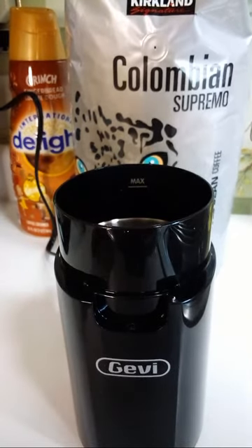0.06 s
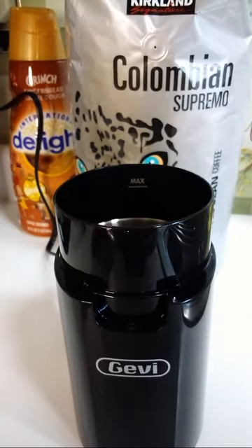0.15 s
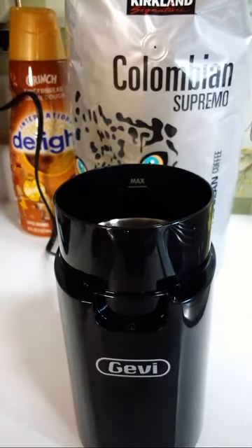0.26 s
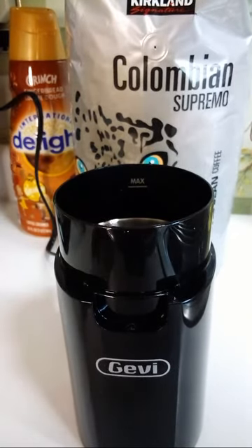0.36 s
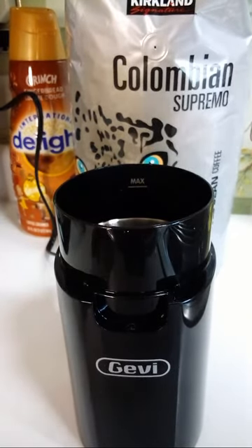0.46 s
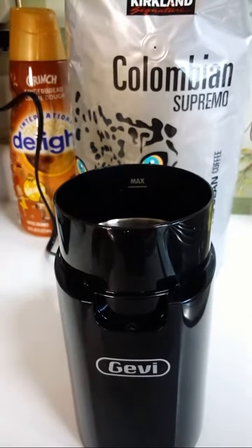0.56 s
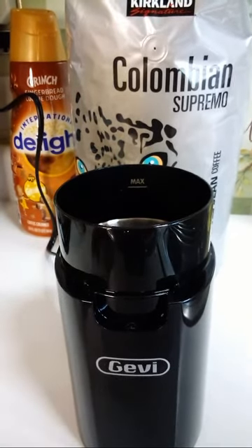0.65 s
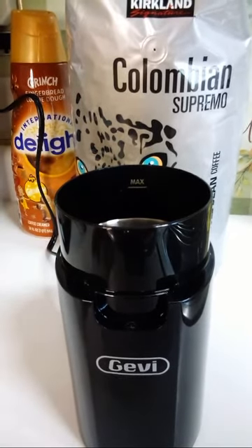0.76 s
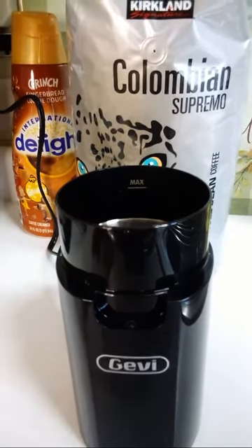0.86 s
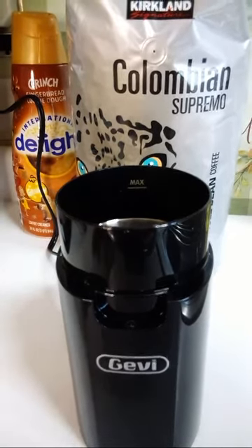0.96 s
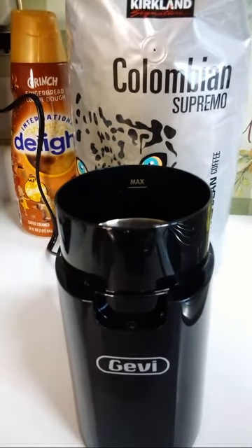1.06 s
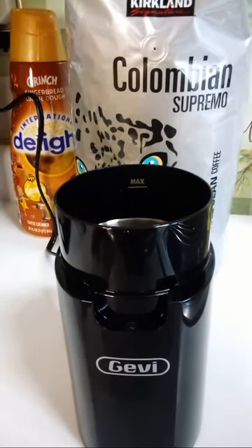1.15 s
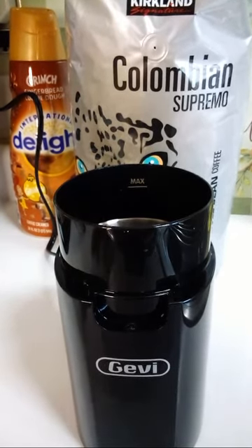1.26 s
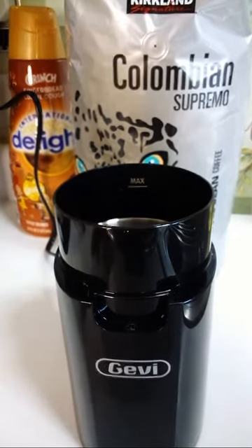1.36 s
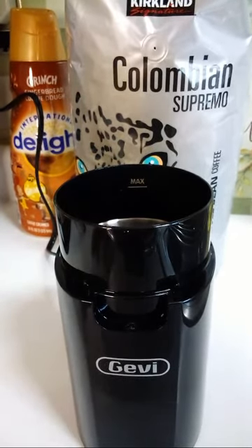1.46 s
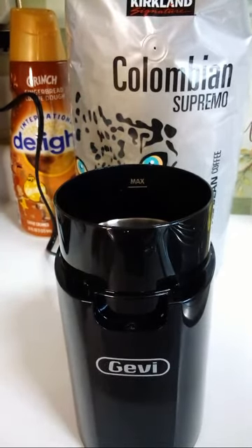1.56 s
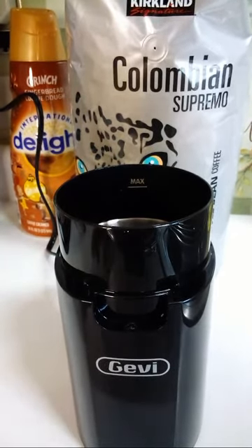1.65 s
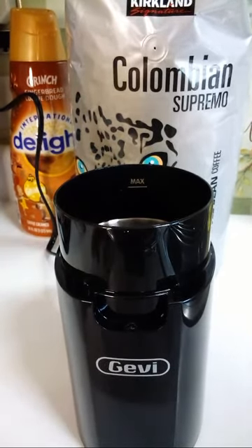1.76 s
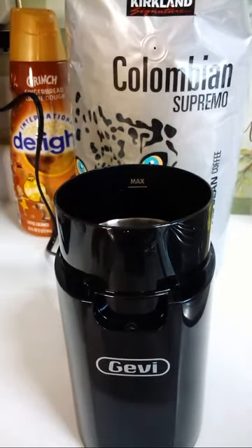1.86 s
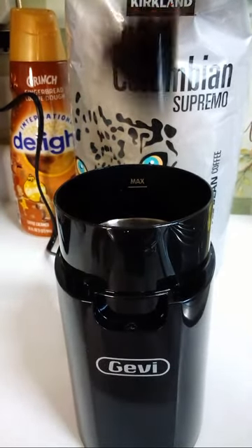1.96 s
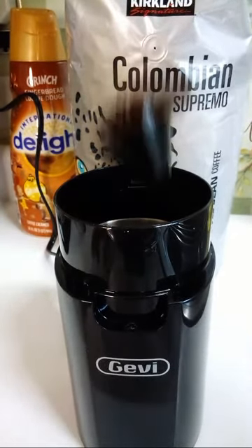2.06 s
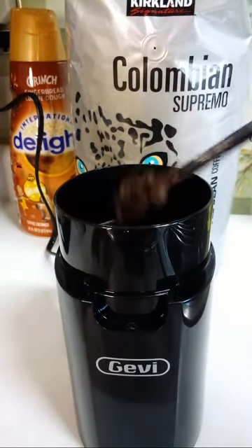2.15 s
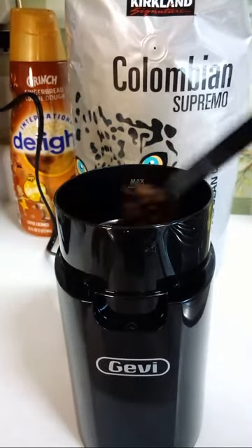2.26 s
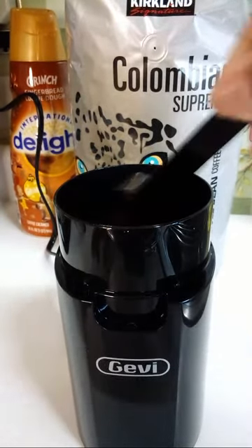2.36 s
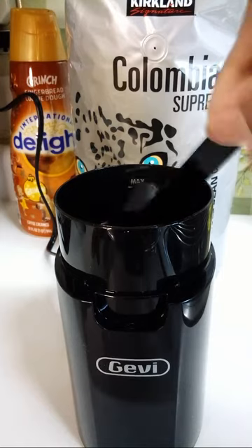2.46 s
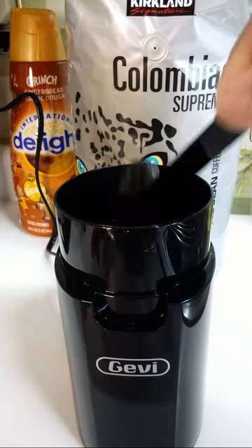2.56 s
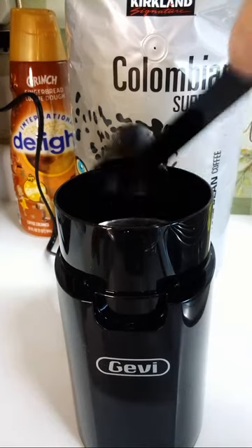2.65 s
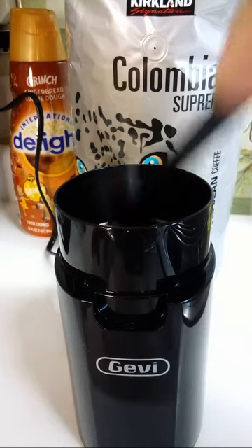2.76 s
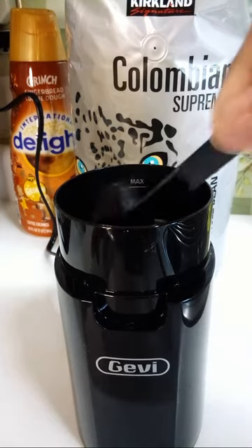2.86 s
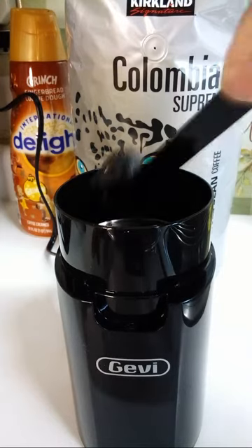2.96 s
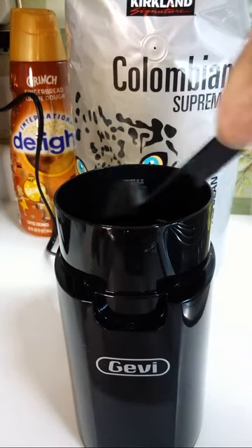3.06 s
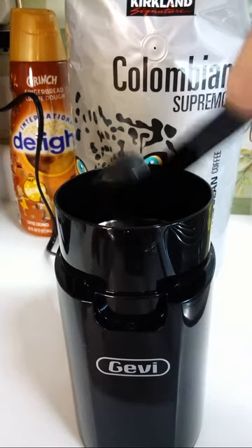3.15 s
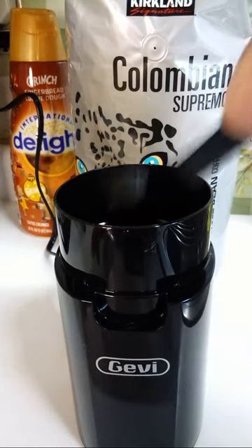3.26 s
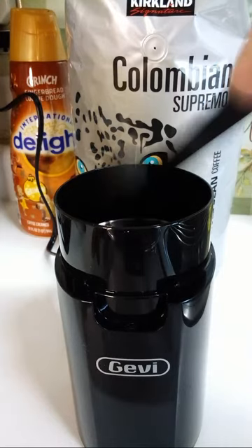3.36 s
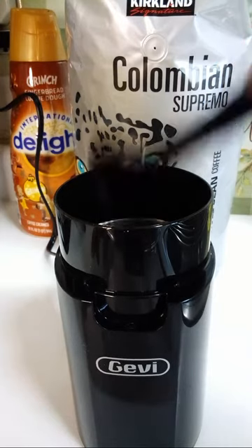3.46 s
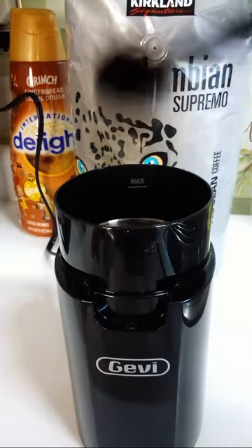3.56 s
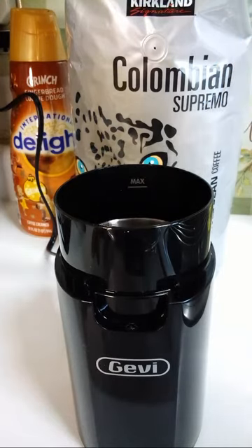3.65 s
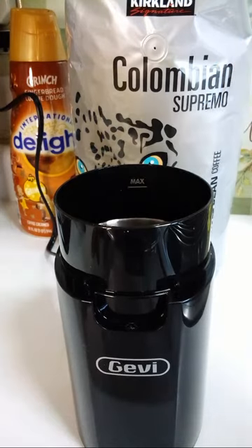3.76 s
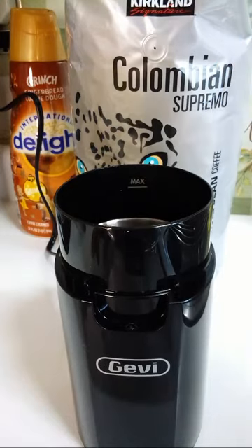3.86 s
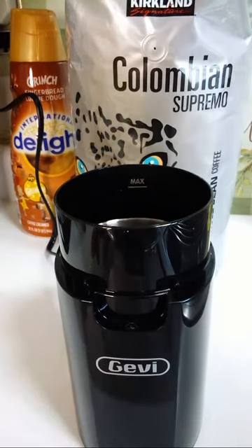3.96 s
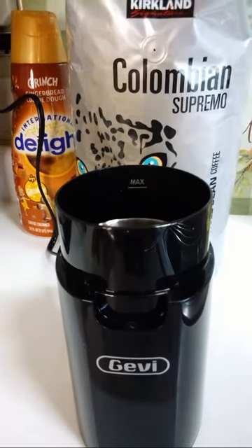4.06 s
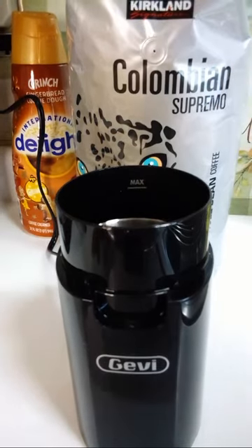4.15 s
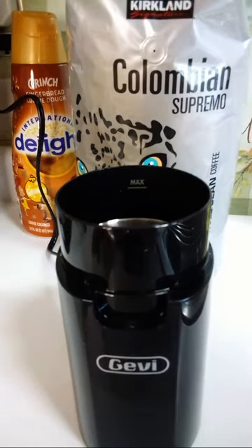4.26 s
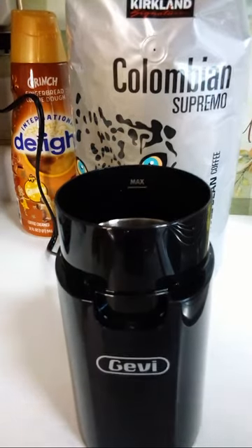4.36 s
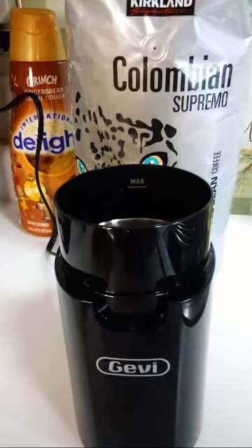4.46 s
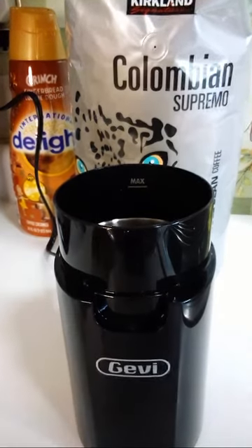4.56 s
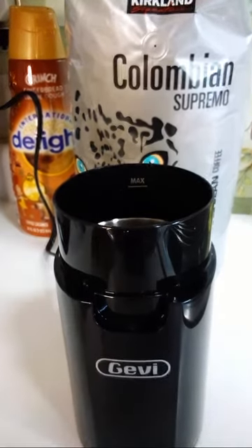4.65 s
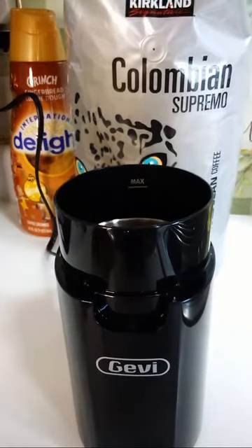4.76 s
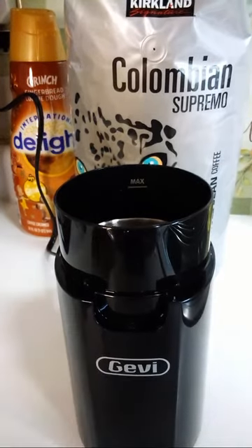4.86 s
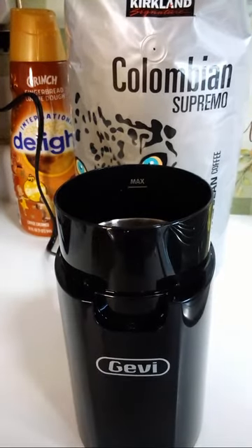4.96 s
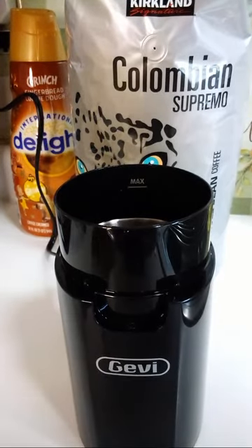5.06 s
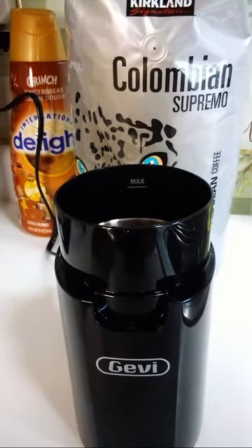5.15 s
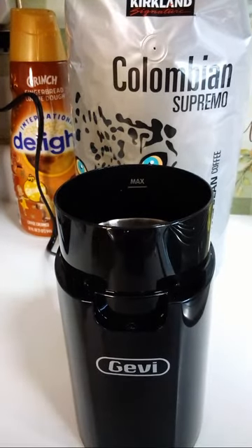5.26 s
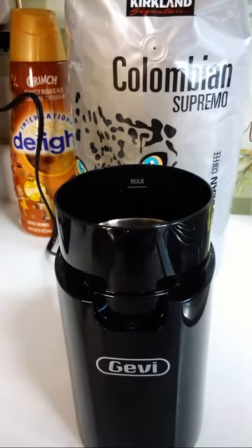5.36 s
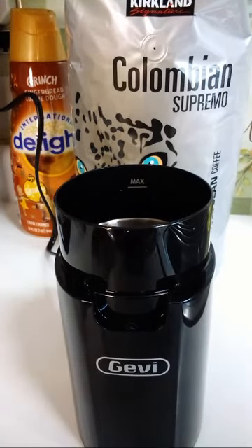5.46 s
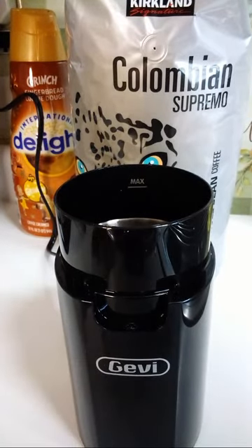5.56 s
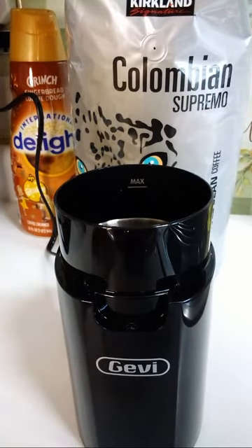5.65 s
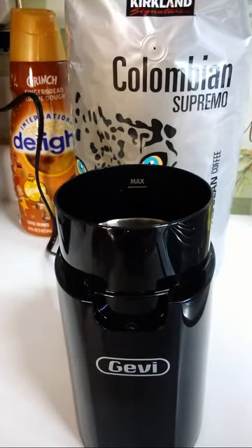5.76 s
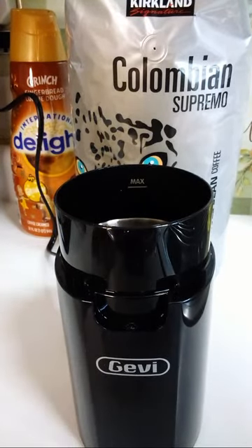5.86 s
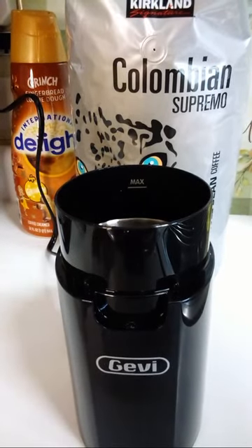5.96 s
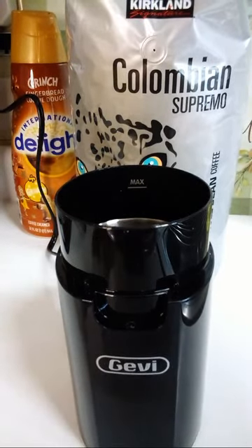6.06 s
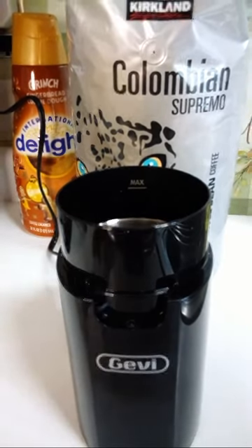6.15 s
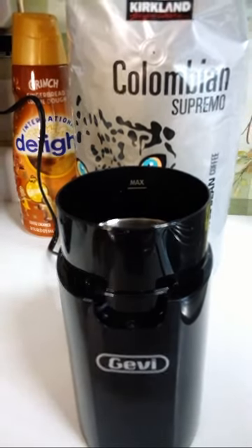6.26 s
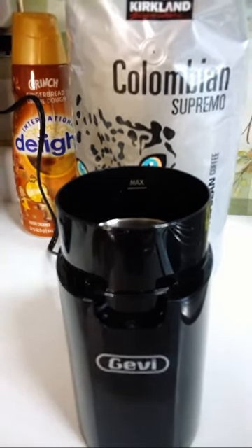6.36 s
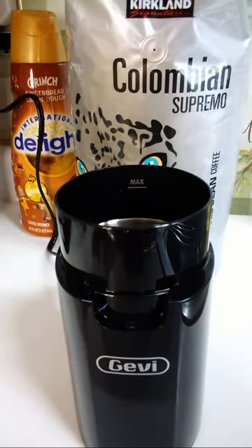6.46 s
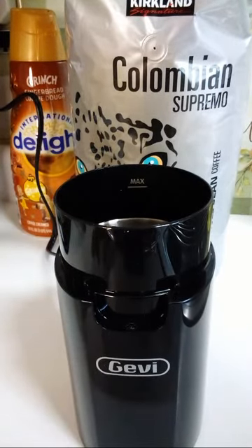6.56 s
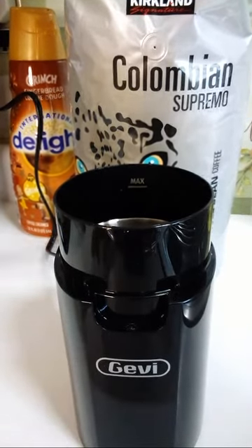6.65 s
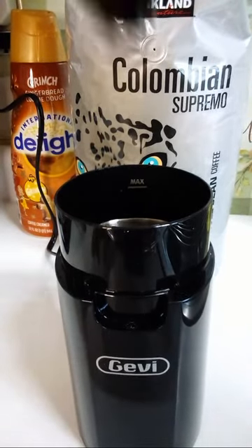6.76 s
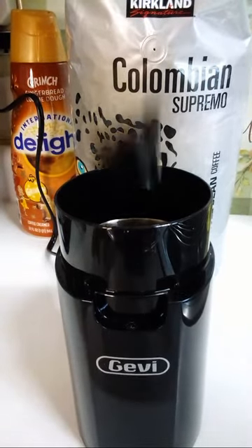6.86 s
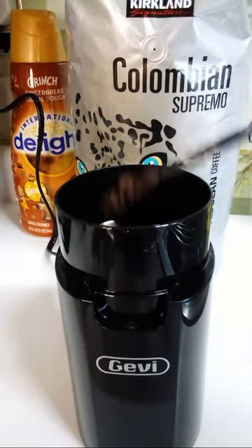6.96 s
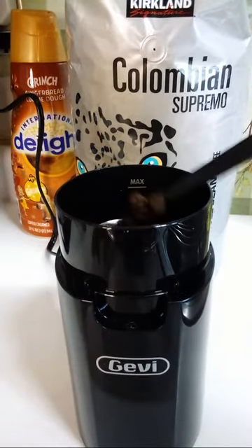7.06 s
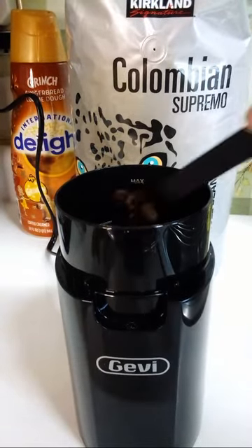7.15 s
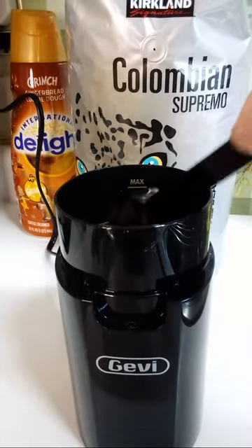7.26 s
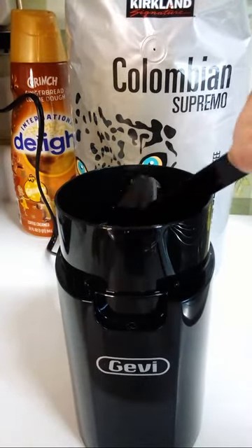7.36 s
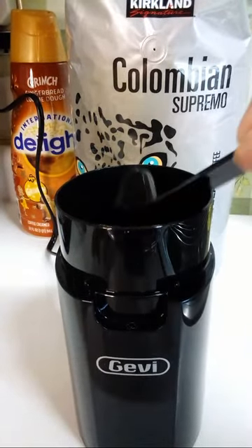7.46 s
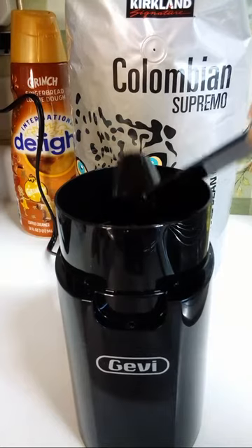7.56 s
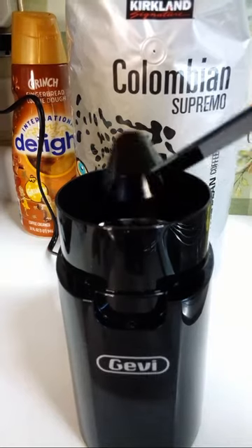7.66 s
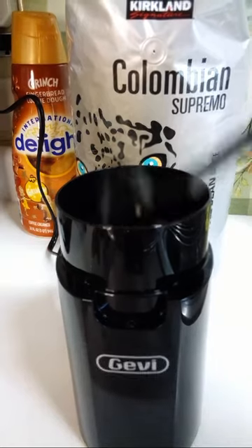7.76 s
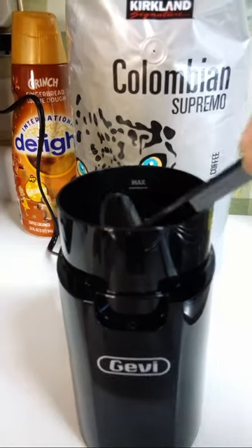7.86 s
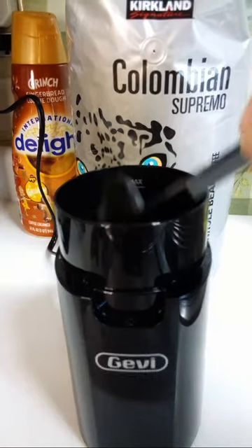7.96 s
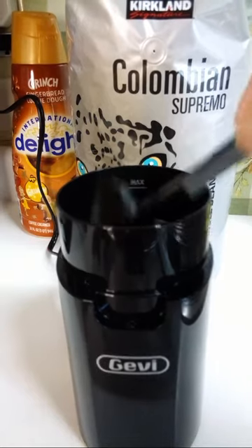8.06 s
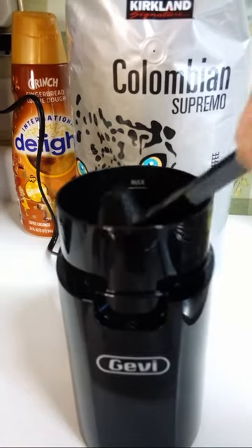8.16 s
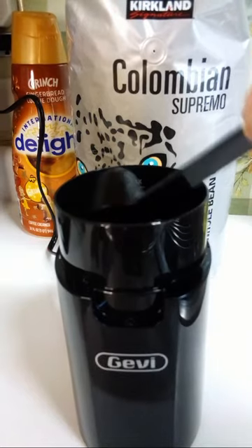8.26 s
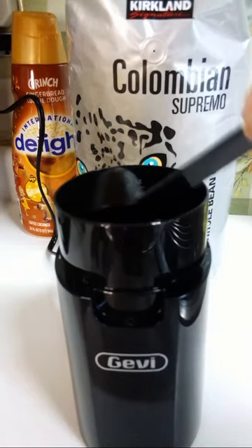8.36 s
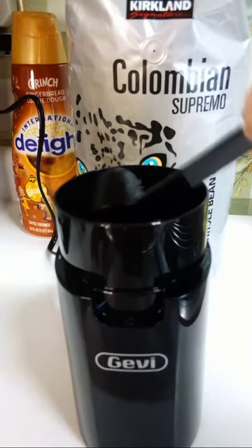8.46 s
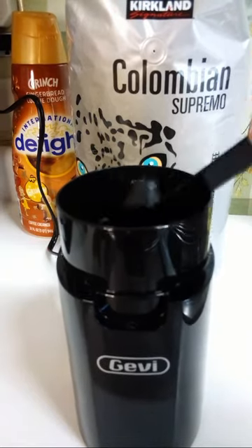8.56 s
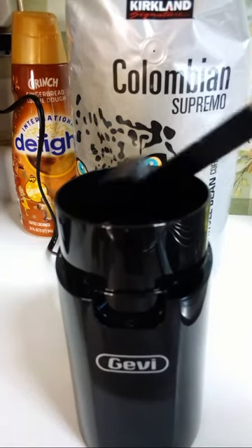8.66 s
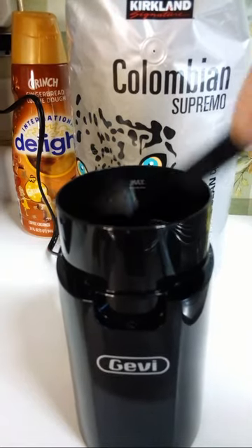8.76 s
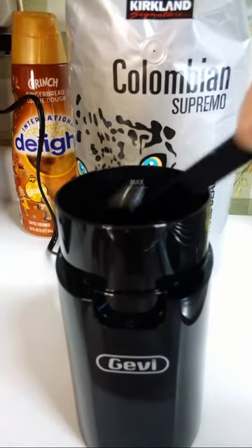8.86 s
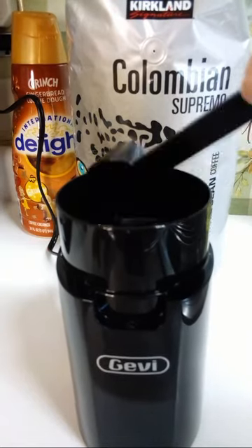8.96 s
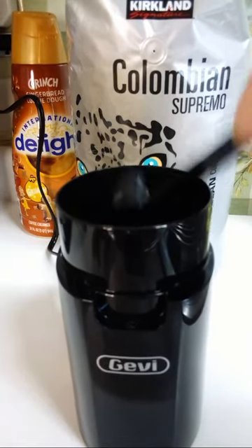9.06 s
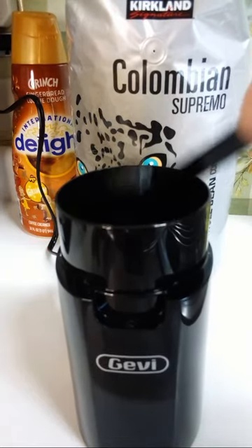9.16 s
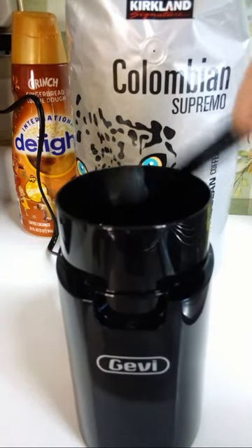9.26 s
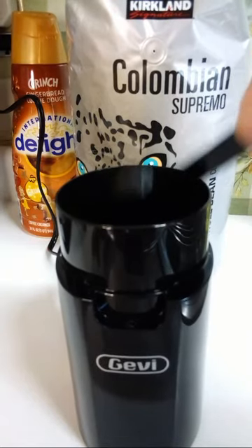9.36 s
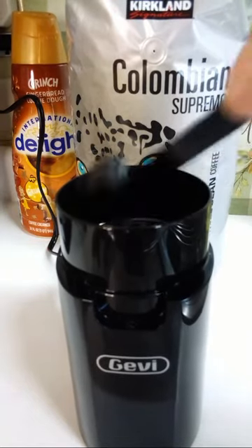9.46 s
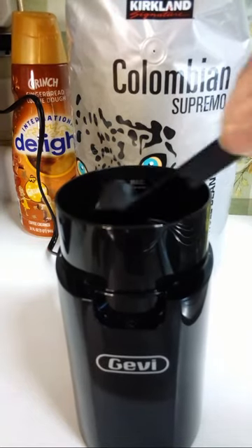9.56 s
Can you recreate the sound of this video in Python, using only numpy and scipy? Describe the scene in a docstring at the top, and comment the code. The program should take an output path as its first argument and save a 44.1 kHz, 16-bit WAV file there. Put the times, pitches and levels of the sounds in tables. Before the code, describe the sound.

Coffee beans are scooped from a rustling foil bag and clatter into a small grinder's steel bowl, twice, in a quiet kitchen.

```python
"""Over a low wavering hum and faint hiss, a plastic scoop digs through a foil bag of coffee beans: filtered crackle,
foil hiss, rumble. A dull shuffle swells, then beans pour into the steel bowl of a small grinder: noise cracks and
clatter, decaying modes of bowl, rim and shell, random rebounds, a trickle of small beans between.
A thin ping, a second dig with scoop clacks, a second pour. Bumps and faint ticks are scattered throughout.
A phone stands close by in a quiet kitchen; a noise tail forms the room's answer."""
import sys
import numpy as np
from scipy import signal
from scipy.fft import rfft, irfft, next_fast_len
from scipy.io import wavfile
from scipy.ndimage import uniform_filter1d

SR = 44100
rng = np.random.default_rng(int(sys.argv[2]) if len(sys.argv) > 2 else 0)


def put_to_file(sound):
    """Save the sound as 16-bit audio at rate SR, in the file named by the first command-line argument."""
    columns = np.atleast_2d(sound).T  # one column per channel
    safe = np.clip(columns, -1, 1)
    whole_steps = np.round(safe * 32767)
    wavfile.write(sys.argv[1], SR, whole_steps.astype(np.int16))


N = 422919

# scoop knocking the rim, or heavy clump landing: t/s, blow level/dB, shell re blow/dB, rim re blow/dB, favoured f/Hz
KNOCKS = [(2.2631, -11.5, -11.5, -4.5, 940), (2.795, -31, -17, 3.5, 1190), (2.8186, -23, -1.5, -5.5, 1240),
          (3.0556, -18, -5, -5.5, 1275), (3.0746, -30.5, -4.5, -1, 1130), (3.2421, -28, 0, 3, 1310),
          (3.4078, -23, -14, 0.5, 1204), (7.0329, -25, -31.5, -2, 652), (7.167, -24, -2.5, -0.5, 1020),
          (7.8224, -24, -7, -14, 615), (7.8785, -30, -4, -7, 695), (8.1122, -30, -2, -8.5, 712),
          (8.3226, -26.5, -6, -4.5, 710), (8.533, -21, -16, -10, 1310), (8.8073, -24.5, -11, -2.5, 722),
          (9.0698, -20.5, -14, -24, 1345), (9.3084, -21, -12.5, -11.5, 1390),
          (9.5528, -18, -16, -18.5, 1440)]
# loose beans hitting steel: t/s, blow level/dB, favoured f/Hz
BEANS = [(2.176, -13.5, 6700), (2.3126, -18, 5450), (2.3411, -15.5, 6200), (2.4148, -23, 6200),
         (2.463, -23, 4600), (2.4814, -14.5, 6300), (2.5014, -21, 4450), (2.6, -30, 4100),
         (2.634, -22, 4030), (2.6654, -18, 6140), (2.766, -31, 6240), (7.0825, -25.5, 4600),
         (7.2677, -30.5, 4500), (7.3376, -28.5, 4500), (7.4247, -38.5, 4340), (7.5776, -41.5, 3600),
         (7.6261, -34, 4400), (7.782, -35.5, 4400), (7.9548, -29.5, 5040), (7.9857, -15, 6270),
         (8.0322, -24, 6000), (8.1817, -32, 6400), (8.31, -37, 4350), (8.3994, -30.5, 6400),
         (8.5235, -28.5, 5000), (8.5593, -13.5, 6200), (8.7929, -36.5, 5000), (9.0831, -16.5, 6150)]
# modes of the grinder shell: f/Hz, level/dB, t60/s
SHELL_MODES = [(686.5, 1.5, 0.11), (1101, -1, 0.14), (1209, 1.5, 0.22), (1306, 10, 0.033)]
# modes of the bowl rim: f/Hz, level/dB, t60/s
RIM_MODES = [(2535, 8.5, 0.042), (2772, 2.5, 0.033), (2890, -1.5, 0.036)]
# modes of the bowl: f/Hz, level/dB, t60/s
BOWL_MODES = [(3840, -14.5, 0.027), (4298, -5, 0.06), (4740, -9, 0.03), (6330, 2.5, 0.09),
              (6520, -0.5, 0.07)]
# broad clatter spectrum: f/Hz, relative density/dB
CLATTER_SPECTRUM = [(400, -26.5), (2200, -18.5), (2600, -6.5), (3400, -6.5), (6400, -2.2), (7300, -11),
                    (8000, -17.5)]
# treble spectrum of sparkle and foil: f/Hz, relative density/dB
SPARKLE_SPECTRUM = [(7000, -36), (8000, -1.5), (11500, -5), (12500, 4), (16000, -3)]
# scoop tilts that let beans run: t/s, running time/s, level/dB
TILTS = [(2.176, .52, -40.5), (2.761, 0.038, -38.5), (7.026, 0.038, -45), (7.204, 0.16, -53.5),
         (7.4, 0.49, -67), (7.556, 0.55, -58)]
# two digs in the bag: t/s, bean rush level/dB, foil hiss re rush/dB, rumble re rush/dB
DIGS = [
    [(0, -61.5, 7.5, -16), (.085, -52.5, -8, 6.5), (.3, -57.5, 3.5, -6), (.345, -48, -1.5, -0.5),
     (.43, -59.5, -5, 1.5), (.55, -63.5, -34, 2.5), (.59, -79, 8, -14), (.7, -59, -22, 2),
     (.76, -119, -10, 15)],
    [(4.483, -76, -9, 4), (4.492, -48.5, -52, 6), (4.55, -39.5, -2, -1.5), (4.64, -41, -9.5, -4.5),
     (4.67, -51, -15, -2.5), (4.74, -48.5, -5, -3), (4.8, -59, -12, -2), (5.08, -50, -3, 2),
     (5.32, -53.5, 4.5, -14.5), (5.52, -79, 9, 5), (5.63, -66.5, -4, 7), (5.68, -89, 1, 1)],
]
# bean rush spectrum: f/Hz, relative density/dB
RUSH_SPECTRUM = [(500, -21), (1500, -8.5), (2300, -3), (3500, -10.5), (6500, -8), (8000, -32)]
# rumble spectrum of the shifting mass: f/Hz, relative density/dB
RUMBLE_SPECTRUM = [(60, -17.5), (130, -9.0), (500, -4), (750, -13.0), (1200, -34.0)]
# beans shifting as the full scoop is carried: t/s, level/dB
CARRY_SWELL = [(1.4, -87.5), (2.17, -66)]
# shuffle spectrum: f/Hz, relative density/dB
SHUFFLE_SPECTRUM = [(350, -12.5), (800, 0), (1300, -12.5), (4000, -31.5)]
# beans clacking on the scoop: t/s, peak level/dB
SCOOP_CLACKS = [(0.087, -38), (.248, -45), (0.697, -48), (5.1686, -27.5), (5.181, -32), (5.2444, -31),
                (5.269, -30.5), (5.296, -32.5)]
# modes of the scoop: f/Hz, level/dB, t60/s
SCOOP_MODES = [(2740, 3, 0.031), (5200, 7, 0.0027), (6750, 0.5, 0.021)]
# dull bumps through the counter: t/s, level/dB, base f/Hz
BUMPS = [(0.066, -27.5, 175.4), (0.202, -34, 183), (0.707, -40, 166.5), (1.331, -48.5, 408),
         (2.82, -31.5, 296), (3.07, -31.5, 238.4), (3.26, -35.5, 247), (4.493, -30.5, 179.3),
         (4.643, -28, 150), (4.77, -33.5, 426), (4.918, -40.5, 440), (7.092, -43, 311)]
# modes of a bump: multiple of base f/1, level/dB, t60/s
BUMP_MODES = [(.55, 4.5, 0.076), (1.0, 9.5, 0.12), (2.3, 1, 0.047)]
# faint ticks of foil and handle: t/s, noise level/dB
TICKS = [(0.328, -53), (0.526, -52), (0.854, -61.5), (4.447, -62), (5.433, -45.5), (5.524, -52),
         (6.0806, -53)]
# one thin metallic ping: t/s, peak level/dB, f/Hz, t60/s
PING = (3.804, -57, 5820, .13)
# room tail spectrum: f/Hz, relative density/dB
TAIL_SPECTRUM = [(2500, -8.5), (6000, -3.5), (8000, -29.5)]
# kitchen hiss spectrum: f/Hz, relative density/dB
HISS_SPECTRUM = [(30, -32), (46, -14.5), (72, -0.5), (235, -25), (298, -22.5), (1090, -35), (9990, -52),
                 (13700, -51), (16500, -57)]
# slow course of the low hum: t/s, level/dB
HUM_SWELL = [(0, -60), (6.5, -82), (9.6, -69.5)]

FLUTTER_RAD = .9
SHELL_SPOT_DB_PER_OCT, BOWL_SPOT_DB_PER_OCT = -20.5, -11.5  # away from the favoured pitch
CLACK_EDGE_RATIO, CLACK_T60_S, CLACK_DB = 1.03, .03, -9.5  # CLACK_DB: before body mix
CRACK_T60_S, CRACK_DB = 0.0056, -4  # first contact, re clatter
GRAZE_S, GRAZE_DB = .006, -30  # scrape ahead of the full blow
KNOCK_BRIGHT_DB, BEAN_BRIGHT_DB = -18.5, -7  # mean treble re blow
BRIGHT_SCATTER_DB, COLOUR_SCATTER_DB = 3, 4  # no two blows alike
RUN_UP_S, THIN_DB_PER_S, SETTLE_DB_PER_S = 0.016, 6, 185.5  # settling adds to thinning
HISS_DB = -65
TOP_HZ = 16000


def strikes():
    """Blows snap, clack near a favoured pitch, clatter, sparkle and ring bowl; knocks also ring rim and shell."""
    rings, snaps, clatter, sparkle, thud = np.zeros((5, N))
    t = np.arange(5000) / SR
    rise = 1 - fade(t, 0.0057)
    for s, peak_db, *knock, spot_hz in list(KNOCKS) + list(BEANS):
        s = s - GRAZE_S
        push = rebounds(t)
        bright_db = KNOCK_BRIGHT_DB if knock else BEAN_BRIGHT_DB
        bright_db += BRIGHT_SCATTER_DB * rng.standard_normal()

        bowl_tilt_db = 0 if knock else BOWL_SPOT_DB_PER_OCT * octaves_off(BOWL_MODES, spot_hz)
        body = undb(-14.0) * ring(BOWL_MODES, t, 4.0, bowl_tilt_db, FLUTTER_RAD)
        clack = spot_clack(t, spot_hz)
        if knock:
            shell_db, rim_db = knock
            shell_tilt_db = SHELL_SPOT_DB_PER_OCT * octaves_off(SHELL_MODES, spot_hz)
            shell = ring(SHELL_MODES, t, 2, shell_tilt_db, 1.3)
            body = body + undb(rim_db) * ring(RIM_MODES, t, 1.7, rough=FLUTTER_RAD)
            body = body + undb(shell_db) * (shell + clack)
            add(thud, s, undb(peak_db + shell_db - 9.0) * rise * fade(t, 0.03))
        else:
            body = body + undb(-5) * clack
        add(rings, s, undb(peak_db) * signal.fftconvolve(push, body)[:len(t)])

        contact = push * (t > GRAZE_S - 1 / SR)  # scrape excites no snap or sparkle
        glint = signal.fftconvolve(contact, fade(t, 0.0078))[:len(t)]
        add(sparkle, s, undb(peak_db + bright_db) * glint)
        add(snaps, s, undb(peak_db + bright_db + 6.5) * contact)

        decay = rise * fade(t, 0.039) + undb(CRACK_DB) * fade(t, CRACK_T60_S)
        contour = signal.fftconvolve(push, decay)[:len(t)]
        add(clatter, s, level(clatter_noise(t), peak_db - 10.5) * contour)
    thud = thud * level(band(rng.standard_normal(N), 360, 2100, order=1), 0)
    return rings + band(snaps, 3400, 16000) + thud + clatter + sparkle * noise(SPARKLE_SPECTRUM)


def octaves_off(modes, spot_hz):
    """Distance of each mode from the pitch that the struck spot favours."""
    return np.abs(np.log2(np.array(modes)[:, :1] / spot_hz))


def spot_clack(t, spot_hz):
    """Narrow decaying noise at the favoured pitch."""
    clack = band(rng.standard_normal(len(t)), spot_hz / CLACK_EDGE_RATIO, spot_hz * CLACK_EDGE_RATIO)
    clack = clack * fade(t, CLACK_T60_S)
    return undb(CLACK_DB) * clack / np.max(np.abs(clack))


def clatter_noise(t):
    """Broad clatter noise with a chance colour for each blow."""
    hz = np.geomspace(500, 8000, 18)
    scatter = np.c_[hz, COLOUR_SCATTER_DB * rng.standard_normal(len(hz))]
    return colour(colour(rng.standard_normal(len(t)), CLATTER_SPECTRUM), scatter)


def rebounds(t):
    """A scrape, full contact, then neighbours jostling in sparse decaying impulses; unit energy."""
    chance = rng.standard_normal(len(t))
    sparse = (np.abs(chance) > 2.7) * np.abs(chance)
    push = sparse * undb(-18.5) * fade(t, 0.11) * (t > GRAZE_S)
    push = push + undb(GRAZE_DB) * chance * (t < GRAZE_S) * t / GRAZE_S
    push[int(GRAZE_S * SR)] = 1
    return push / np.sqrt(np.sum(push ** 2))


def trickle():
    """Small beans tick, each tick waking one mode; rolling beans keep rim and shell humming."""
    t = np.arange(3000) / SR
    ticks = np.zeros(N)
    for mode in [*RIM_MODES, *BOWL_MODES]:
        ticks += signal.fftconvolve(grains(60, 3.5), ring([mode], t, 0, rough=1))[:N]
    rattle = crackle(CLATTER_SPECTRUM, 140, 2.6, .04)
    sparks = patter(130, 2.8, 0.012) * noise(SPARKLE_SPECTRUM)
    shell = undb(-1.0) * ring(SHELL_MODES, t, 0, rough=2 * FLUTTER_RAD)
    hum = ring(RIM_MODES, t, 0, rough=2 * FLUTTER_RAD) + shell
    rolling = level(signal.fftconvolve(grains(400, 6.0), hum)[:N], -12.5)
    return flow() * (rolling + level(ticks, -14.0) + undb(-1.5) * rattle + undb(-5.0) * sparks)


def flow():
    """Beans start to run at each tilt, thin out slowly while they run, then settle fast."""
    out = np.zeros(N)
    for s, running_s, db in TILTS:
        t = np.arange(N) / SR - s
        loss_db = THIN_DB_PER_S * t + SETTLE_DB_PER_S * np.maximum(t - running_s, 0)
        out += undb(db - loss_db) * np.clip(t / RUN_UP_S, 0, 1)
    return out


def dig():
    """Beans rush round the scoop, the foil hisses and the mass shifts with a rumble."""
    rush, foil_db, rumble_db = curves(DIGS)
    beans = crackle(RUSH_SPECTRUM, 1100, 1.6, .04)
    foil = patter(1000, 1.8, 0.023) * noise(SPARKLE_SPECTRUM)
    rumble = patter(240, 1.4, 0.057) * noise(RUMBLE_SPECTRUM)
    return rush * (beans + undb(foil_db) * foil + undb(rumble_db) * rumble)


def carry():
    """Dense dull impacts swell into a shuffle towards the first pour."""
    (swell,) = curves([CARRY_SWELL])
    return swell * patter(300, 1.8, .1) * noise(SHUFFLE_SPECTRUM)


def scoop_clacks():
    """Beans clack on the scoop and wake its short modes."""
    out, t = np.zeros(N), np.arange(5000) / SR
    for s, peak_db in SCOOP_CLACKS:
        add(out, s, undb(peak_db) * ring(SCOOP_MODES, t, 2.0, rough=FLUTTER_RAD))
    return out


def counter_bumps():
    """Bumps are a few soft-edged low modes under a crunch of decaying noise."""
    out, t = np.zeros(N), np.arange(5000) / SR
    for s, db, hz in BUMPS:
        modes = np.multiply(BUMP_MODES, [hz, 1, 1])
        body = ring(modes, t, 0.96, rough=FLUTTER_RAD) * (1 - fade(t, 0.008))
        crunch = band(rng.standard_normal(len(t)), 400, 3000, order=1) * fade(t, 0.02)
        add(out, s, undb(db) * body + undb(db - 12.0) * crunch)
    return out


def faint_ticks():
    """Foil and handle tick in short decaying bursts of treble noise."""
    out, t = np.zeros(N), np.arange(5000) / SR
    for s, db in TICKS:
        add(out, s, undb(db) * band(rng.standard_normal(len(t)), 3500, 19000) * fade(t, 0.094))
    return out


def ping():
    """One decaying mode gives a thin metallic ping."""
    out, t = np.zeros(N), np.arange(5000) / SR
    s, peak_db, hz, t60 = PING
    add(out, s, undb(peak_db) * ring([(hz, 0, t60)], t, 0))
    return out


def room(x):
    """Tiles and cupboards answer with a short tail that loses its treble first."""
    t = np.arange(20000) / SR
    chance = rng.standard_normal((2, len(t)))
    treble = undb(-8) * band(chance[1], 7000, 16000) * fade(t, .13)
    tail = colour(chance[0], TAIL_SPECTRUM) * fade(t, 0.37) + treble
    return signal.fftconvolve(x, undb(-38.5) * tail * (1 - fade(t, 0.009)))[:N]


def kitchen():
    """Faint steady hiss, and two narrow noise bands as a low hum that wavers quickly."""
    (swell,) = curves([HUM_SWELL])
    low = band(rng.standard_normal(N), 60, 85)
    high = undb(1.0) * band(rng.standard_normal(N), 120, 130)
    waver = undb(4 * walk(5))
    return undb(HISS_DB) * noise(HISS_SPECTRUM) + swell * waver * level(low + high, 0)


def ring(modes, t, scatter_db, tilt_db=0, rough=0):
    """Decaying modes of chance strength and pitch; touching loose beans flutter the phase (rough/rad). Peak 1."""
    hz, db, t60 = np.transpose(modes)[:, :, None]
    strength, detune = rng.standard_normal((2, len(modes), 1))
    flutter = rng.standard_normal((len(modes), len(t)))
    flutter = uniform_filter1d(flutter, size=256, axis=1) * np.sqrt(256)
    wobble = rough * flutter * np.minimum(t / .02, 1)  # clean at first
    swing = np.sin(2 * np.pi * hz * (1 + .01 * detune) * t + wobble)
    x = np.sum(undb(db + tilt_db + scatter_db * strength) * fade(t, t60) * swing, axis=0)
    return x / np.max(np.abs(x))


def crackle(table, rate, spread_db, t60):
    """Impacts clack in nine bands of a coloured noise, each band at its own pace; rms 1."""
    wash = noise(table)
    out = np.zeros(N)
    for hz in np.geomspace(600, 6800, 9):
        out += patter(rate, spread_db, t60) * band(wash, hz / 1.2, hz * 1.2)
    return level(out, 0)


def patter(rate, spread_db, t60):
    """Loudness contour of dense impacts that each die away; rms 1."""
    impacts = np.abs(grains(rate, spread_db))
    return level(signal.fftconvolve(impacts, fade(np.arange(4000) / SR, t60))[:N], 0)


def grains(rate, spread_db):
    """Random impacts, rate/s^-1, many small and a few large; rms 1."""
    hits = rng.random(N) < rate / SR
    size = undb(spread_db * rng.exponential(size=N))
    return level(hits * size * rng.choice([-1, 1], N), 0)


def walk(rate):
    """Random levels drawn every 1 / rate s and slewed."""
    k = int(SR / rate)
    return uniform_filter1d(np.repeat(rng.standard_normal(N // k + 1), k), k)[:N]


def noise(table):
    """Steady noise of the given colour, rms 1."""
    return level(colour(rng.standard_normal(N), table), 0)


def colour(x, table):
    """Weight the spectrum by f/Hz, level/dB points."""
    hz, db = np.transpose(table)
    size = next_fast_len(len(x))
    f = np.maximum(np.arange(size // 2 + 1) * SR / size, 1)
    gain = undb(np.interp(np.log(f), np.log(hz), db))
    return irfft(rfft(x, size) * gain, size)[:len(x)]


def band(x, lo_hz, hi_hz, order=2):
    """Butterworth band-pass."""
    return signal.sosfilt(signal.butter(order, [lo_hz, hi_hz], "band", fs=SR, output="sos"), x)


def curves(tables):
    """Columns of several spans on the sample grid; the first becomes a gain, silent outside its spans."""
    t = np.arange(N) / SR
    rows = np.concatenate(tables)
    columns = [np.interp(t, rows[:, 0], c) for c in rows.T[1:]]
    inside = sum((t >= table[0][0]) & (t <= table[-1][0]) for table in tables)
    columns[0] = undb(columns[0]) * uniform_filter1d(1. * inside, size=400)
    return columns


def fade(t, t60):
    """Exponential decay by 60 dB in t60/s."""
    return np.exp(-np.log(1000) * t / t60)


def undb(db):
    """dB to amplitude."""
    return 10 ** (np.asarray(db) / 20)


def level(x, db):
    """Scale to an rms level/dB."""
    return x * undb(db) / np.sqrt(np.mean(x ** 2))


def add(out, s, x):
    """Mix x into out at s/s."""
    i = int(s * SR)
    out[i:i + len(x)] += x[:N - i]


def scene():
    """Sum the near sources, their room tail and the kitchen background."""
    near = strikes() + trickle() + dig() + carry()
    near = near + scoop_clacks() + counter_bumps() + faint_ticks() + ping()
    return (near + room(near) + kitchen())[None]


def record(dry):
    """The phone drops the deepest bass and cuts the top."""
    lean = signal.sosfilt(signal.butter(4, 48, "high", fs=SR, output="sos"), dry)
    return signal.sosfilt(signal.ellip(8, .2, 60, TOP_HZ, fs=SR, output="sos"), lean)


dry = scene()
out = record(dry)
put_to_file(out)
```